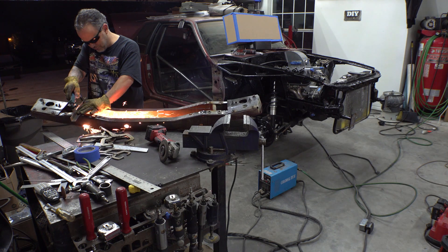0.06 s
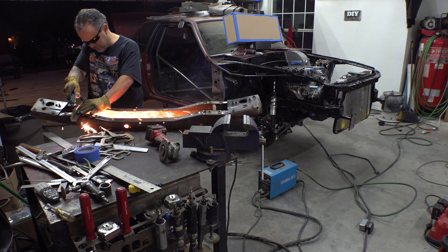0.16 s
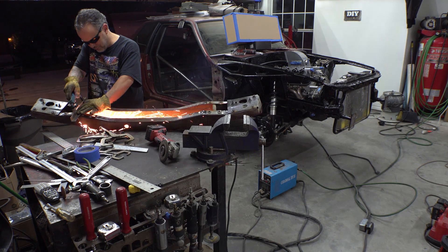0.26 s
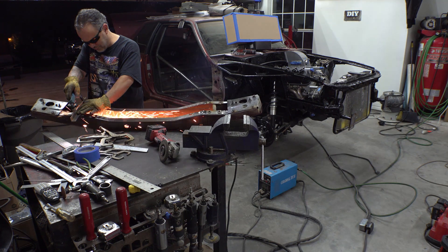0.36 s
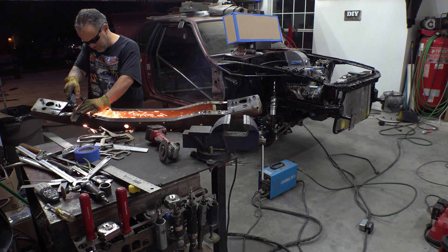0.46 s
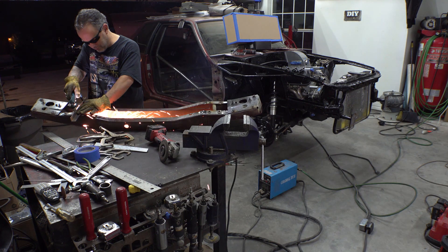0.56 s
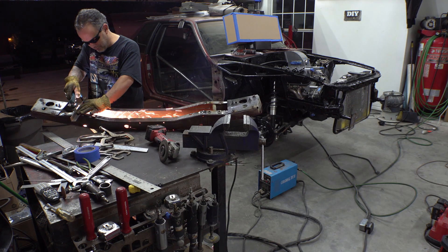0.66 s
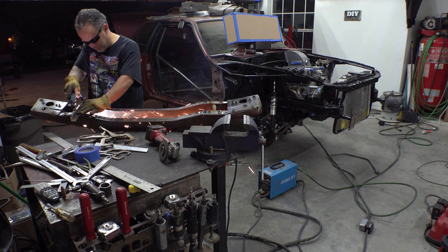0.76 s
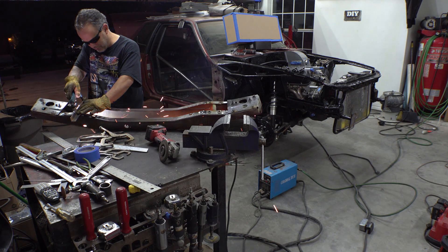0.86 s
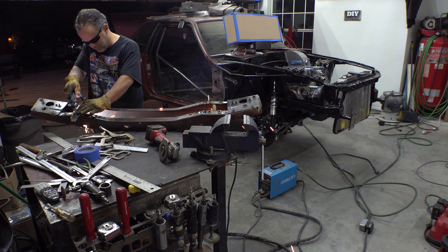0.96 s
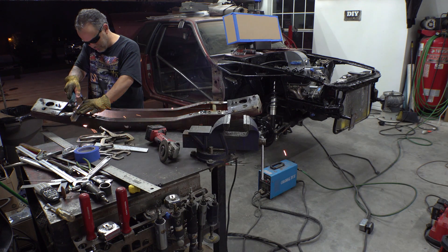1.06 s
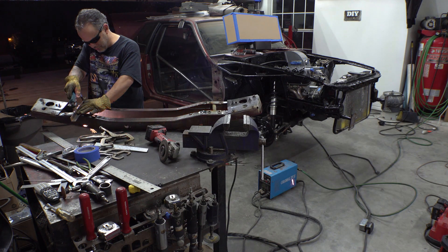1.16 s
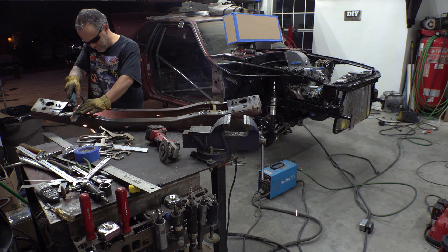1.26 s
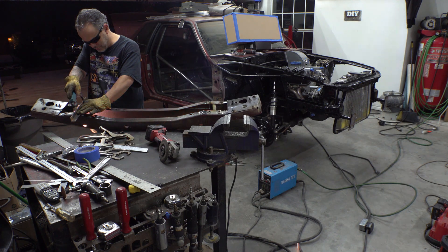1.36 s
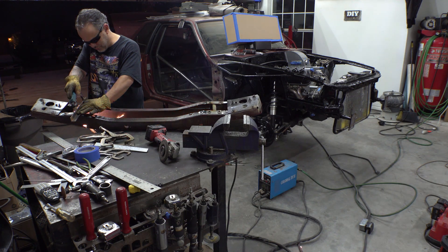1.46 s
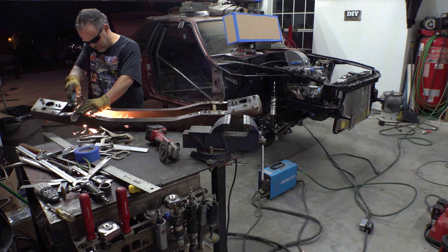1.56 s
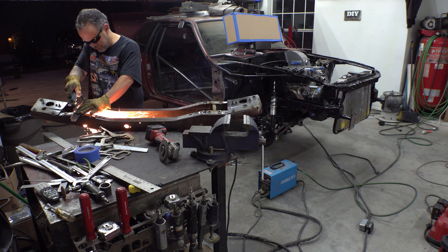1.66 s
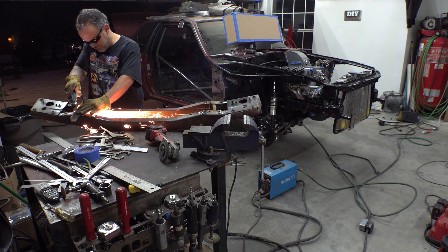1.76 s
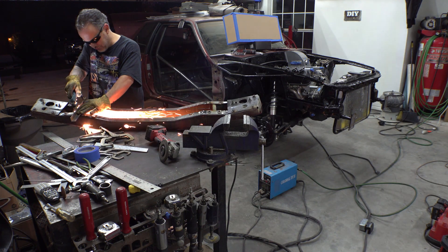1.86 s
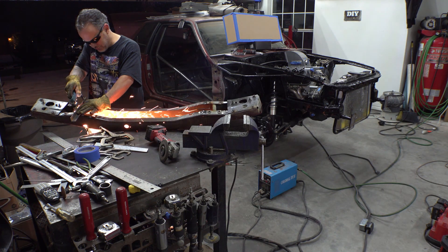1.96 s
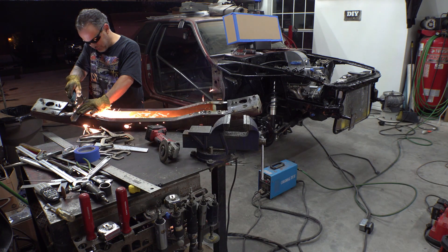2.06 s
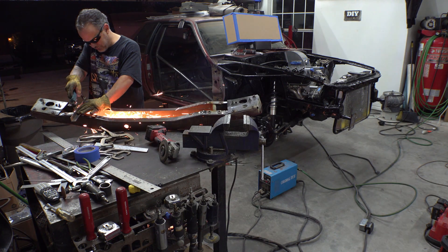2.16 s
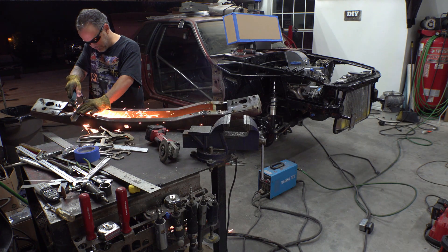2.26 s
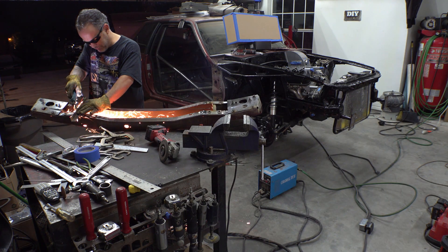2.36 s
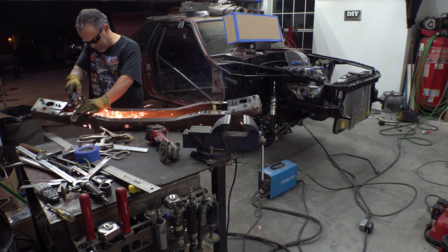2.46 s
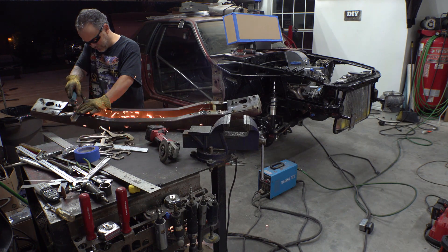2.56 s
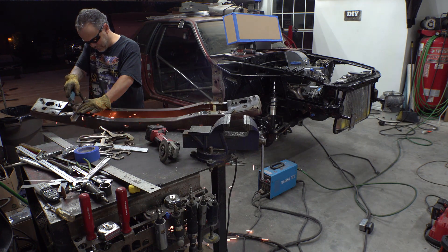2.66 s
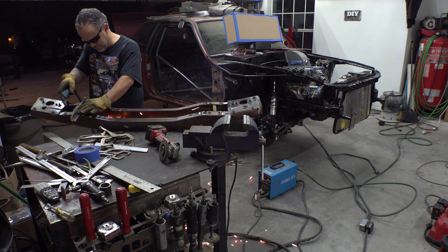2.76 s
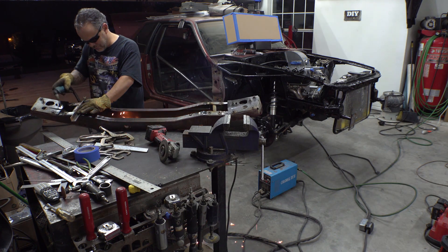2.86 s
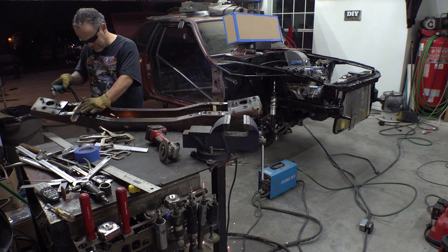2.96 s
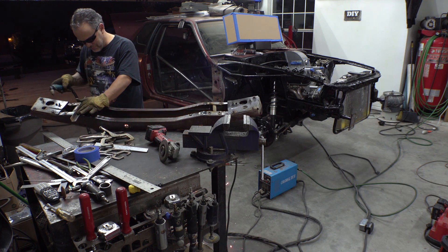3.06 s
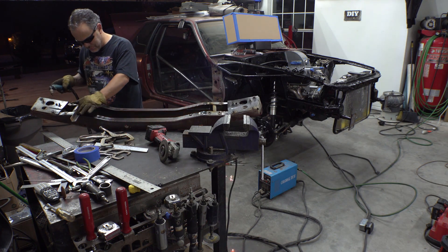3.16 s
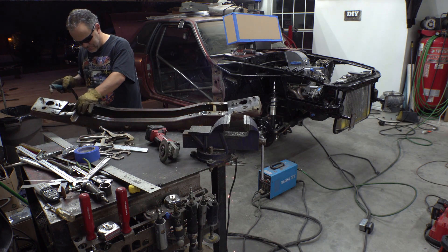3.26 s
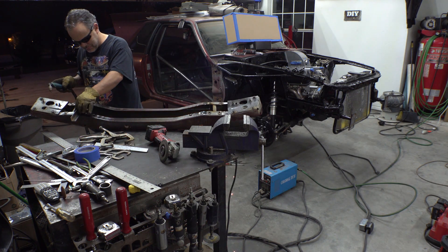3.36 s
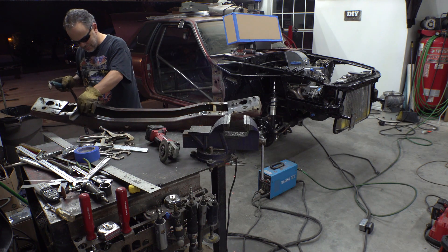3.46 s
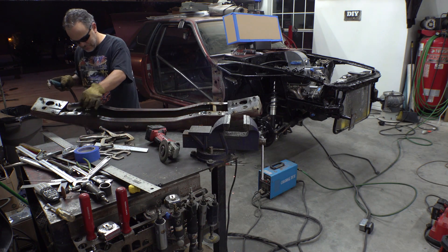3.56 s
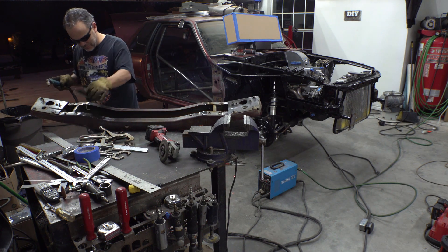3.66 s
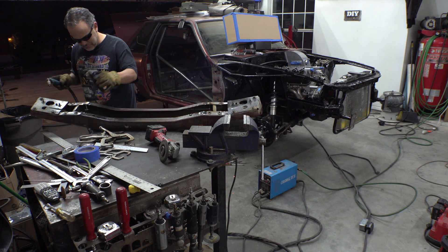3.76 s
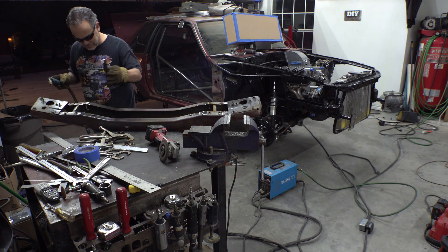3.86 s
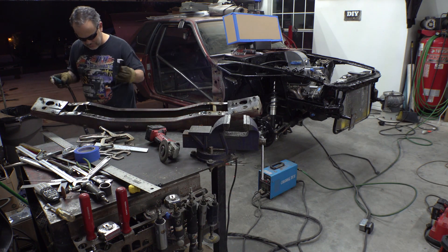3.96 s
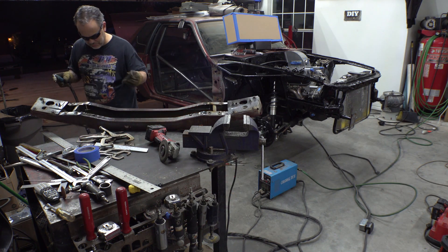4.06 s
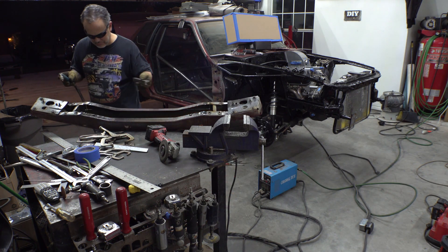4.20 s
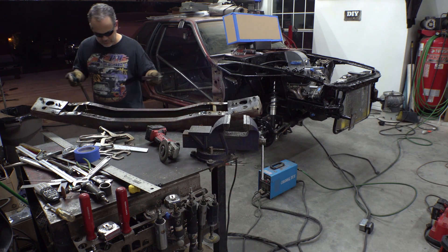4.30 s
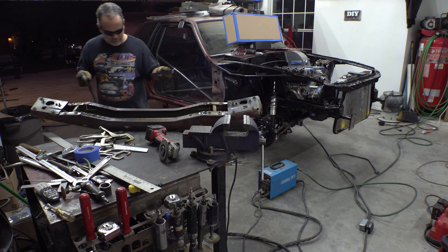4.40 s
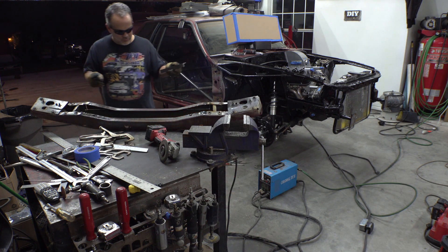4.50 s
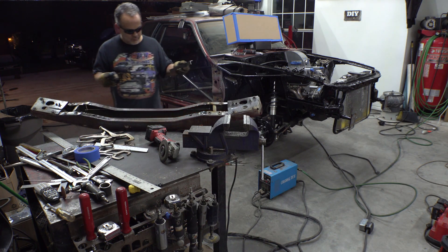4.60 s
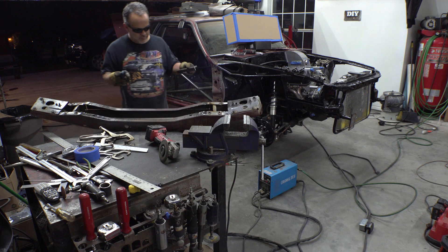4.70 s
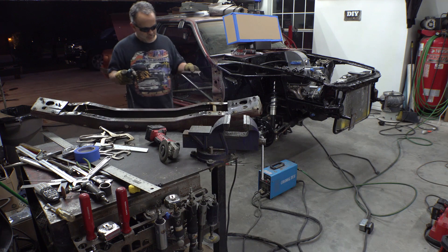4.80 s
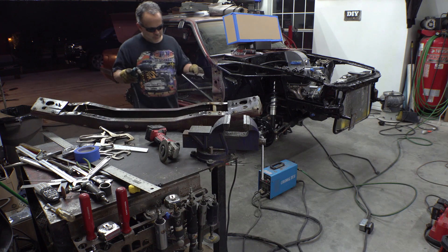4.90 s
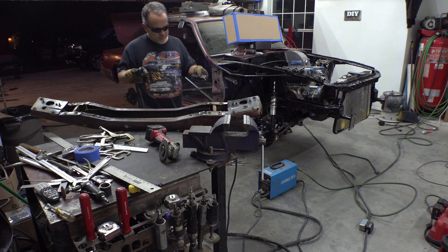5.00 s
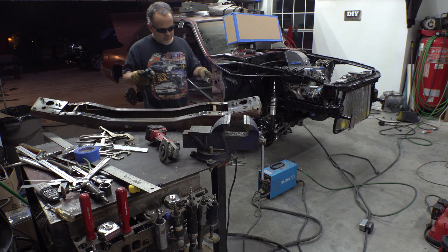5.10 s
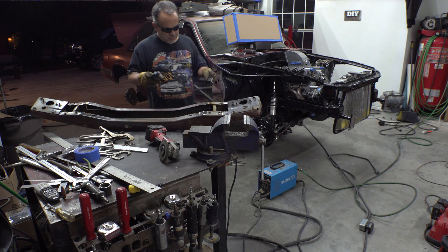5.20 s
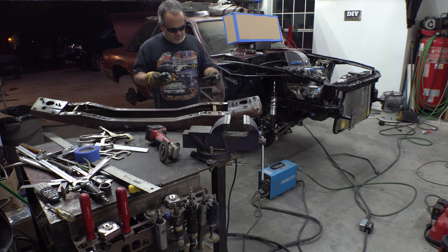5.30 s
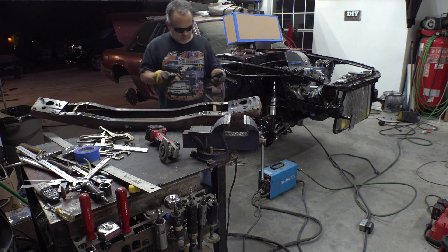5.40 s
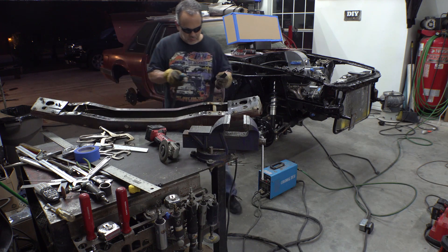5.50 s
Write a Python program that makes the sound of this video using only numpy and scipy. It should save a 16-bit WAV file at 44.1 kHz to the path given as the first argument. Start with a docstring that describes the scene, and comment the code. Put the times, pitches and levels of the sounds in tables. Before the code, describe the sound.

A plasma torch roars and whistles through a hollow steel rail, snaps off, then hisses cooling air amid a few steel clinks.

```python
"""In a garage, a plasma torch cuts a hollow steel rail, then lets go and keeps blowing cooling air.
The jet and its whistles are shaped noise, and noise through resonances makes the rail's cavity roar.
A screech is a wavering sine; the arc snaps out, steel knocks ring, air brushes edges, a shoe lands.
The power supply's fan hums below. One microphone feeds both channels; only the deepest rumble differs."""
import sys
import numpy as np
from scipy import signal
from scipy.fft import rfft, irfft, next_fast_len
from scipy.io import wavfile
from scipy.ndimage import map_coordinates

SR = 44100
rng = np.random.default_rng(int(sys.argv[2]) if len(sys.argv) > 2 else 0)


def unload_audio(sound):
    """Save the sound as a 16-bit wav file, at the path given as the first command line argument."""
    columns = np.transpose(np.atleast_2d(sound))
    # keep every value between -1 and 1, then stretch to whole-number steps
    steps = np.round(np.clip(columns, -1, 1) * 32767)
    wavfile.write(sys.argv[1], SR, steps.astype(np.int16))


def voltage_ratio(decibels):
    """Convert decibels (scalar or array-like) to amplitude ratios, 20 dB per decade."""
    exponent = np.asarray(decibels, float) / 20
    return 10 ** exponent


N = 244314
TIME_S = np.arange(N) / SR
ARC_OFF_S, ARC_DIES_S = 2.597, .006   # trigger released


def rms_one(x):
    """Scale to unit rms."""
    return x / np.sqrt(np.mean(np.abs(x) ** 2) + 1e-20)


def in_time(rows):
    """Join each column's points by straight lines, one value a sample; times come first."""
    times, *columns = np.transpose(rows)
    return [np.interp(TIME_S, times, column) for column in columns]


def drift(rate_hz):
    """Slow chance with spread 1: noise at every 40th sample, smoothed twice."""
    r = np.exp(-80 * np.pi * rate_hz / SR)
    noise = rng.standard_normal(N // 40 + 2002)
    slow = signal.lfilter([1], [1, -2 * r, r * r], noise)[2000:]   # skip the filter's start
    return np.interp(np.arange(N) / 40, np.arange(len(slow)), rms_one(slow))


def plateau(start, full, fading, gone):
    """0 to 1 and back along straight lines; times in seconds."""
    return np.interp(TIME_S, [start, full, fading, gone], [0, 1, 1, 0])


def swells(rows):
    """One envelope a row, peak 1: steady rise and fall in dB around the peak time."""
    envelopes = []
    for peak_s, rise_s, fall_s, *rest in rows:
        tens_of_db_down = np.maximum((peak_s - TIME_S) / rise_s, (TIME_S - peak_s) / fall_s)
        envelopes.append(voltage_ratio(-10 * tens_of_db_down))
    return np.array(envelopes)


def together(envelopes, level_db):
    """Unrelated noises add in power."""
    return np.sqrt(voltage_ratio(np.array(level_db)) ** 2 @ envelopes ** 2)


def tone(hz):
    """A sine that follows a moving pitch; rms 1."""
    return np.sqrt(2) * np.sin(2 * np.pi * np.cumsum(hz) / SR)


def resonance(x, hz, width_hz):
    """Two-pole band-pass, gain 1 on top."""
    r = np.exp(-np.pi * width_hz / SR)
    top = np.array([1, 0, -1]) * (1 - r * r) / 2
    return signal.lfilter(top, [1, -2 * r * np.cos(2 * np.pi * hz / SR), r * r], x)


def gliding_band(hz, width_hz):
    """Narrow noise carried along a moving centre; rms 1."""
    r = np.exp(-1.15 * np.pi * width_hz / SR)
    noise = rng.standard_normal(len(hz)) + 1j * rng.standard_normal(len(hz))
    slow = signal.lfilter([1], [1, -2 * r, r * r], noise)
    return rms_one((slow * np.exp(2j * np.pi * np.cumsum(hz) / SR)).real)


def turbulence(colour, tilt_db, patchy_db, flutter_db, count):
    """Noise in overlapping bands: each swells by itself, all flutter together; rms 1 before these and tilt."""
    size = next_fast_len(N)
    hz = np.fft.rfftfreq(size, 1 / SR) + 1
    colour_hz, colour_db = np.transpose(colour)
    shape_db = np.interp(np.log(hz), np.log(colour_hz), colour_db)
    spectrum = rfft(rng.standard_normal(size)) * voltage_ratio(shape_db)
    spectrum = spectrum / np.sqrt(np.mean(irfft(spectrum, size) ** 2))
    centres = np.linspace(0, np.sqrt(16500), count) ** 2
    out = np.zeros(N)
    for k, centre in enumerate(centres):
        share = np.interp(hz, centres, np.arange(count) == k)   # triangle around this centre
        band = irfft(spectrum * share, size)[:N]
        octaves = np.log2((centre + 1000) / 6000)   # tilt turns about 5 kHz
        out += band * voltage_ratio(tilt_db * octaves + patchy_db * drift(4.0))
    return out * voltage_ratio(flutter_db * drift(24.0))


def ripple():
    """The arc current swells at twice the mains rate, -1 to 1."""
    ripple_hz = 120
    return np.cos(2 * np.pi * ripple_hz * TIME_S)


def arc_on():
    """1 while the arc burns."""
    return plateau(-1, 0, ARC_OFF_S, ARC_OFF_S + ARC_DIES_S)


def arc_stretch():
    """0 to 1 as the torch runs off solid steel and the arc stretches, then back."""
    return plateau(.74, .86, 1.0, 1.1)


# cutting jet, two bites into the steel, duller while the kerf is fresh:
# start_s [s], level_db [dB], brightness [dB per octave]
JET_COURSE = [(0, -22, -.3), (.3, -23.5, 0), (.68, -22.3, -1), (1.15, -23.5, -1.5), (1.45, -24.3, 0),
              (1.72, -25.3, -.3), (2.0, -24, 1.5), (2.3, -23.8, .3), (2.6, -23.2, .6)]
# colour of the cutting jet's hiss: pitch_hz [Hz], relative_db [dB per Hz]
JET_COLOUR = [(88, -43), (150, -25), (321, -21), (390, -12), (460, -5), (687, -6.5), (830, -9), (940, -15),
              (1260, -14.5), (1500, -5), (2170, -18.5), (2750, -6), (3270, -5), (4470, -6), (6800, -4.5),
              (7400, -1.5), (10200, -0.5), (12000, -7), (15900, -12.5)]


def cutting_jet():
    """Hot gas rushes through the kerf as turbulent hiss; it weakens while the arc is stretched."""
    stretch_loss_db = 5
    level_db, tilt_db = in_time(JET_COURSE)
    level_db = level_db - stretch_loss_db * arc_stretch()
    hiss = turbulence(JET_COLOUR, tilt_db, 0.59, 0.7, count=13)
    return voltage_ratio(level_db) * arc_on() * hiss * (1 + 0.02 * ripple())


# broad whistles that last all through the cut: pitch_hz [Hz], width_hz [Hz], level_db [dB]
NOZZLE_WHISTLES = [(7480, 480, -33.5), (6150, 500, -40), (10100, 600, -38), (5050, 500, -41)]


def nozzle_whistles():
    """The nozzle picks bands out of the jet; their pitch and level wander slowly."""
    pitch_wander, swell_db = .013, 1.3   # share of the pitch; dB
    out = np.zeros(N)
    for hz, width_hz, level_db in NOZZLE_WHISTLES:
        band = gliding_band(hz * (1 + pitch_wander * drift(1.5)), width_hz)
        out += voltage_ratio(level_db + swell_db * drift(2.5)) * arc_on() * band
    return out


# passing whistles of the kerf and nearby edges:
# start_s [s], length_s [s], from_hz [Hz], to_hz [Hz], level_db [dB]
PASSING_WHISTLES = [(.03, .35, 13300, 12400, -38), (.02, .15, 8600, 8500, -35), (.04, .16, 7850, 7750, -33),
                    (.8, .35, 11500, 11400, -39), (1.3, .3, 7500, 7250, -33), (2.3, .3, 7100, 7200, -36),
                    (.1, .65, 10000, 9800, -36), (.05, .72, 3200, 3300, -40.5),
                    (.36, .4, 11250, 11500, -33.5), (1.08, .38, 3650, 3450, -37.5),
                    (1.1, .3, 3100, 3200, -38.5), (2.75, .09, 3550, 3300, -44),
                    (1.55, .23, 11850, 12100, -39), (1.8, .3, 11000, 12600, -39),
                    (1.15, .37, 10400, 10150, -36), (1.28, .32, 8550, 8400, -36),
                    (1.45, .9, 7300, 7800, -33), (1.48, .42, 9200, 10200, -31),
                    (1.85, .43, 10600, 10450, -32), (2.2, .41, 9300, 9300, -34),
                    (.12, .5, 14300, 14000, -41), (2.2, .4, 13450, 13050, -39),
                    (2.28, .33, 11300, 11150, -32), (2.93, .19, 9300, 8600, -41),
                    (4.95, .33, 9050, 9000, -40), (4.95, .27, 10850, 10850, -40)]


def passing_whistles():
    """Kerf and nearby edges pick bands out of the jet; each swells, slides and fades."""
    width_hz, pitch_wander, flicker_db, faint_db = 420, .009, 1.6, -43   # Hz, share of pitch, dB, dB
    faint = []
    for a, b, c, d in rng.random((44, 4)):   # chance adds faint whistles
        from_hz = 5000 + 10200 * c
        faint.append((2.2 * a, .15 + .25 * b, from_hz, from_hz * (.96 + .07 * d), faint_db))
    out = np.zeros(N)
    for start_s, length_s, from_hz, to_hz, level_db in PASSING_WHISTLES + faint:
        first, size = int(start_s * SR), int(length_s * SR)
        swell = signal.windows.tukey(size, .45) * voltage_ratio(flicker_db * drift(20.0)[:size])
        hz = np.linspace(from_hz, to_hz, size) * (1 + pitch_wander * drift(5.0)[:size])
        out[first:first + size] += voltage_ratio(level_db) * swell * gliding_band(hz, width_hz)
    return out


def whistles():
    """All the whistling bands flutter together."""
    return voltage_ratio(.6 * drift(7.4)) * (passing_whistles() + nozzle_whistles() + stretch_whistles())


# reflections off bench, vice and car frame: extra_path_ms [ms], strength [0-1]
CLOSE_BOUNCES = [(1.702, 0.08), (2.9, 0.06), (4.598, 0.12)]


def bounced(x):
    """Close reflections comb the hiss into fine bands that waver as the torch moves."""
    out = x.copy()
    power = 1
    for path_ms, strength in CLOSE_BOUNCES:
        lag = (path_ms + 0.049 * drift(1.0)) * SR / 1000   # in samples
        out += strength * map_coordinates(x, [np.arange(N) - lag], order=3, mode="mirror")
        power += strength ** 2
    return out / np.sqrt(power)


# share of the jet that blows on into the rail, heard in its lower resonances: start_s [s], level_db [dB]
LOWER_ROAR = [(0, -48), (.22, -35), (.75, -34), (.82, -41.5), (1.05, -41), (1.25, -37.5), (1.97, -34),
              (2.18, -38.5), (2.4, -36), (2.5, -39), (2.6, -37)]
# gusts into the rail: peak_s [s], rise_s [s per 10 dB], fall_s [s per 10 dB],
# lower_db [dB] and upper_db [dB] for the two sets of resonances, ahead of a common trim
RAIL_GUSTS = [(2.055, .01, .08, -33, -34), (2.42, .1, .04, -36, -31), (2.598, .006, .02, -31, -29),
              (2.63, .06, .1, -33, -36), (2.685, .1, .07, -28.5, -42), (2.73, .07, .02, -30, -48),
              (2.79, .04, .07, -40, -41), (2.92, .08, .12, -36, -50), (3.05, .04, .09, -48, -40),
              (3.56, .13, .25, -40, -46), (3.8, .15, .22, -45, -64), (4.39, .3, .12, -45, -61)]
# lower resonances of the hollow rail: pitch_hz [Hz], width_hz [Hz], relative_db [dB]
LOWER_MODES = [(455, 150, 5), (565, 195, 5), (675, 130, 3), (815, 90, -9)]
# upper resonances of the hollow rail: pitch_hz [Hz], width_hz [Hz], relative_db [dB]
UPPER_MODES = [(1508, 93, 4.5), (1420, 67, 0.5), (1707, 114, -4.5), (2842, 50, -3.5), (3215, 90, -2),
               (3468, 120, -2)]


def cavity():
    """Gusty air drives the broad resonances of the hollow rail."""
    upper_db, stretch_loss_db, swell_db, trim_db = -38.5, 4, .9, -3.5
    sputter_s, sputter_length_s, sputter_depth = 2.025, .025, .8   # the roar chokes for a moment
    choke = np.exp(-((TIME_S - sputter_s) / sputter_length_s) ** 2)
    cutting = arc_on() * (1 - sputter_depth * choke)
    lower_steady_db = in_time(LOWER_ROAR)[0]
    upper_steady_db = upper_db - stretch_loss_db * arc_stretch()
    lower_gust_db, upper_gust_db = np.transpose(RAIL_GUSTS)[3:]
    envelopes = swells(RAIL_GUSTS)
    out = np.zeros(N)
    for modes, steady_db, gust_db in ((LOWER_MODES, lower_steady_db, lower_gust_db),
                                      (UPPER_MODES, upper_steady_db, upper_gust_db)):
        steady = cutting * voltage_ratio(steady_db + swell_db * drift(4.0))
        level = np.hypot(steady, together(envelopes, gust_db))
        air = rng.standard_normal(N) * voltage_ratio(2.2 * drift(45.0))
        roar = np.zeros(N)
        for hz, width_hz, mode_db in modes:
            wide = 1.44 * width_hz   # two passes in a row narrow the band again
            roar += voltage_ratio(mode_db) * resonance(resonance(air, hz, wide), hz, wide)
        out += level * voltage_ratio(trim_db) * rms_one(roar)
    return out


# colour of the fan's whirr: pitch_hz [Hz], relative_db [dB per Hz]
FAN_COLOUR = [(88, -47), (150, -15.5), (371, 4), (409, -5), (500, -34), (595, -9), (750, -21.5),
              (1500, -18), (1950, -52), (3300, -120)]
# the fan's blade tones: pitch_hz [Hz], level_db [dB rms]
BLADE_TONES = [(301.5, -64.5), (344.5, -63), (602.9, -69)]


def fan():
    """The power supply's fan: a steady whirr of noise with wavering blade tones."""
    whirr_db = -59
    tones = sum(voltage_ratio(db) * gliding_band(np.full(N, hz), width_hz=8.3) for hz, db in BLADE_TONES)
    return voltage_ratio(whirr_db) * turbulence(FAN_COLOUR, 0, 0.2, 0.62, count=3) + tones


# slow swells of the deep bass: peak_s [s], rise_s [s per 10 dB], fall_s [s per 10 dB], level_db [dB]
BASS_SWELLS = [(2.62, .9, .2, -61), (3.8, .4, .6, -66), (4.7, .6, 2.0, -62)]


def rumble():
    """Deep noise swells and sinks slowly; its lowest part differs a little between channels."""
    floor_db, apart_db = -73, -87.5
    deep_band = signal.butter(1, [85, 240], "band", fs=SR, output="sos")
    deep = signal.sosfilt(deep_band, rng.standard_normal(N))
    lowest_band = signal.butter(4, 45, fs=SR, output="sos")
    apart = signal.sosfilt(lowest_band, rng.standard_normal(N))
    level = np.hypot(voltage_ratio(floor_db), together(swells(BASS_SWELLS), np.transpose(BASS_SWELLS)[3]))
    opposite = np.array([[1], [-1]])   # left and right
    return level * rms_one(deep) + voltage_ratio(apart_db) * rms_one(apart) * opposite


def garage(x):
    """Diffuse tail: decaying noise that starts after the first walls, which swallow treble."""
    t60_s, first_wall_s, wall_cut_hz = 0.49, .008, 8000
    t = np.arange(int(t60_s * SR)) / SR
    tail = rng.standard_normal(len(t)) * voltage_ratio(-60 * t / t60_s) * (t > first_wall_s)
    tail = tail / np.sqrt(np.sum(tail ** 2))
    tail = signal.sosfilt(signal.butter(1, wall_cut_hz, fs=SR, output="sos"), tail)
    return signal.fftconvolve(x, tail)[:N]


def screech():
    """A nearly pure tone, pulsed and bent downward by the current ripple; raised while the arc stretches."""
    on_s, off_s, rise_s, fall_s = .63, 1.15, .08, .04
    start_db, grows_db_per_s = -30, 6
    start_hz, sag_hz_per_s, stretch_hz = 10560, 250, 130
    since_on_s = TIME_S - on_s
    hz = start_hz - sag_hz_per_s * since_on_s + stretch_hz * arc_stretch() ** 2
    hz = hz - 90.0 * ripple() + 90.0 * drift(33.0)
    level = voltage_ratio(start_db + grows_db_per_s * since_on_s)
    level = level * plateau(on_s, on_s + rise_s, off_s - fall_s, off_s)
    pulses = np.exp(1.2 * ripple()) * voltage_ratio(1.2 * drift(40.0))
    return level * rms_one(pulses * tone(hz))


# broad whistles that drop as the arc lengthens:
# short_arc_hz [Hz], long_arc_hz [Hz], width_hz [Hz], level_db [dB at the longest arc]
LONG_ARC_WHISTLES = [(9900, 7750, 600, -30), (10100, 8800, 1000, -30), (10300, 9900, 900, -26.5)]


def stretch_whistles():
    """As the arc lengthens, broad whistles swell in and slide down in pitch."""
    length = plateau(.73, .84, .94, 1.06)   # lengthens, longest, shortens, short again
    out = np.zeros(N)
    for short_hz, long_hz, width_hz, level_db in LONG_ARC_WHISTLES:
        hz = short_hz + (long_hz - short_hz) * length
        out += voltage_ratio(level_db) * np.sqrt(length) * gliding_band(hz, width_hz)
    return out


def pop():
    """One blunt pressure pulse as the arc snaps out and collapses."""
    start_db, pitch_hz, decay_s = -13, 900, .0006   # level before the decay
    t = np.maximum(TIME_S - ARC_OFF_S, 0)
    return voltage_ratio(start_db) * np.sin(2 * np.pi * pitch_hz * t) * np.exp(-t / decay_s)


# cooling air, louder as the idle torch points at the microphone: start_s [s], level_db [dB]
AIR_COURSE = [(2.6, -29.5), (2.69, -31.5), (2.75, -30), (2.87, -35.5), (3.02, -32.5), (3.25, -36),
              (4.0, -32), (4.5, -30.7), (4.75, -28.8), (5.17, -30.3)]
# colour of the cooling air, before it is brightened: pitch_hz [Hz], relative_db [dB per Hz]
COOL_AIR_COLOUR = [(290, -20.5), (500, -10), (561, -17), (867, -15.5), (1020, -21), (1570, -17),
                   (1870, -15.5), (3850, -7.5), (5140, -6.5), (9310, -3), (14200, -13.5), (15900, -20)]


def cooling_air():
    """Cool air hisses on, combed by an echo as the torch swings past a surface, then bleeds away and dulls."""
    brightness_db = 3.5   # per octave
    shut_off_db_per_s, dulling_db_per_s = 41, 13   # fall of level and of brightness after the last row
    swing_s, swing_strength = (4.55, 4.65, 4.9, 5.08), .28   # starts, full, starts to fade, gone
    lag_from_ms, lag_to_ms, echo_above_hz = .465, .535, 4500
    shut_s = np.maximum(TIME_S - AIR_COURSE[-1][0], 0)
    level_db = in_time(AIR_COURSE)[0] - shut_off_db_per_s * shut_s
    tilt_db = brightness_db - dulling_db_per_s * shut_s
    hiss = turbulence(COOL_AIR_COLOUR, tilt_db, 0.6, 0.63, count=10)
    air = voltage_ratio(level_db) * (1 - arc_on()) * hiss
    # the surface is small and returns only treble
    treble = signal.butter(2, echo_above_hz, "high", fs=SR, output="sos")
    bright = signal.sosfiltfilt(treble, air)
    lag_ms = np.interp(TIME_S, [swing_s[0], swing_s[-1]], [lag_from_ms, lag_to_ms])
    echo = map_coordinates(bright, [np.arange(N) - lag_ms * SR / 1000], order=3, mode="mirror")
    return air + swing_strength * plateau(*swing_s) * echo


# air stream brushing over steel edges: peak_s [s], rise_s [s per 10 dB], fall_s [s per 10 dB],
# level_db [dB], brightness [dB per octave]
EDGE_BRUSHES = [(2.65, .1, .1, -40, 2), (2.75, .03, .12, -34, 4), (2.93, .03, .1, -44, -5),
                (3.013, .045, .06, -32, -.5), (3.065, .04, .06, -41, -1.5), (3.12, .08, .11, -41, -1.5),
                (3.43, .1, 1.0, -48, -4.5), (4.9, .8, .2, -45, 4), (5.06, .09, .11, -39, -.7),
                (5.52, .024, .12, -38, 1.5)]
# colour of the brushing hiss, before brightness: pitch_hz [Hz], relative_db [dB per Hz]
EDGE_COLOUR = [(500, -35), (900, -4), (1700, -1), (2250, -7), (2900, -1), (3500, 0), (5000, -9.5),
               (8000, -9), (14000, -20)]


def brushing():
    """Duller hiss where the stream breaks on an edge; the loudest edge sets the colour."""
    level_db, tilt_db = np.transpose(EDGE_BRUSHES)[3:]
    each = swells(EDGE_BRUSHES)
    level = together(each, level_db) + 1e-9   # never divide by zero
    mixed_tilt_db = (tilt_db * voltage_ratio(level_db) ** 2) @ each ** 2 / level ** 2
    return level * turbulence(EDGE_COLOUR, mixed_tilt_db, 0.62, 1.9, count=8)


# steel knocking on steel: start_s [s], strength_db [dB, before each mode's share], pitch_hz [Hz]
STEEL_KNOCKS = [(2.738, -22, 560), (2.922, -26, 980), (3.002, -22, 915), (3.016, -27, 1750),
                (3.124, -35, 1230), (3.415, -33, 1250), (3.509, -39, 401), (3.609, -28, 500),
                (5.492, -50, 877)]
# ringing modes of the steel: pitch_hz [Hz], relative_db [dB], t60_s [s to fall 60 dB]
STEEL_MODES = [(484, -8, 0.3), (670, -10, 0.2), (906, -5, 0.75), (1065, -9, .25), (1227, -6, 0.45),
               (1530, -7, .35), (1790, -8, 0.18), (2880, -9, .3), (3780, -9, 0.3), (4260, -4, 0.1)]


def knocks():
    """Each contact rings the steel modes near its own pitch most; the cut piece clinks free."""
    start_s, strength_db, pitch_hz = np.transpose(STEEL_KNOCKS)
    luck_db = rng.normal(0, 1.5, (len(start_s), len(STEEL_MODES)))
    out = np.zeros(N)
    for k, (hz, mode_db, t60_s) in enumerate(STEEL_MODES):
        clicks = np.full(N, 1e-18)
        away_db = 14.0 * np.abs(np.log2(hz / pitch_hz))   # 14 dB weaker per octave away
        clicks[(start_s * SR).astype(int)] = voltage_ratio(strength_db + mode_db - 7.0 - away_db + luck_db[:, k])
        r, w = voltage_ratio(-60 / (t60_s * SR)), 2 * np.pi * hz / SR
        out += signal.lfilter([0, np.sin(w)], [1, -2 * r * np.cos(w), r * r], clicks)
    light_parts = signal.butter(4, 330, "high", fs=SR, output="sos")   # they push no bass
    return signal.sosfilt(light_parts, out)


# the rail's lowest note sounds: peak_s [s], rise_s [s per 10 dB], fall_s [s per 10 dB], level_db [dB]
LOWEST_NOTES = [(2.9, .1, .08, -48), (3.06, .035, .13, -46), (3.55, .05, .04, -49), (3.62, .05, .05, -44),
                (3.73, .03, .14, -43.5), (3.84, .1, .08, -46), (4.07, .14, .12, -51)]


def hollow_tone():
    """Air across the open end sounds the rail's lowest note, a little unsteady."""
    pitch_hz, rough_db = 488, 3
    unsteady = tone(pitch_hz + 18.0 * drift(45.0)) * voltage_ratio(rough_db * drift(35.0))
    return together(swells(LOWEST_NOTES), np.transpose(LOWEST_NOTES)[3]) * rms_one(unsteady)


def footfall():
    """A soft shoe lands on concrete: one short, dull push."""
    start_s, start_db, pitch_hz, decay_s = 5.494, -37.5, 290, 0.0055   # level before the decay
    t = np.maximum(TIME_S - start_s, 0)
    return voltage_ratio(start_db) * np.sin(2 * np.pi * pitch_hz * t) * np.exp(-t / decay_s)


def scene():
    """All sources reach one microphone, directly and through the garage."""
    garage_db = -6.5
    near = bounced(cutting_jet() + cooling_air() + whistles())
    near = near + screech() + cavity() + hollow_tone() + brushing() + pop()
    small_sources = signal.butter(2, 130, "high", fs=SR, output="sos")   # none of them radiates deep bass
    near = signal.sosfilt(small_sources, near) + footfall()
    rings = knocks()
    return near + rings + voltage_ratio(garage_db) * garage(near + .4 * rings) + fan() + rumble()


def band_limit(x):
    """A steep low-pass at the top of the band."""
    return signal.sosfilt(signal.butter(12, 15740, fs=SR, output="sos"), x)


def record(dry):
    """Peaks are rounded slightly."""
    mix = 0.46 * np.tanh(dry / .45)
    return band_limit(mix)


dry = scene()
out = record(dry)
unload_audio(out)
```